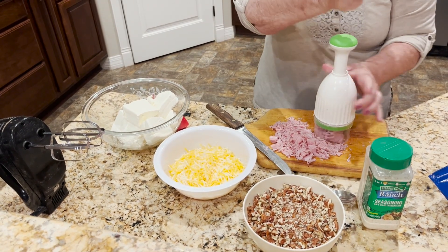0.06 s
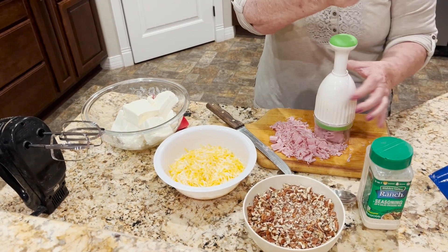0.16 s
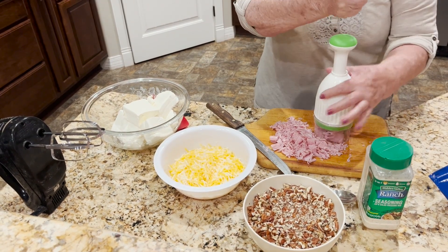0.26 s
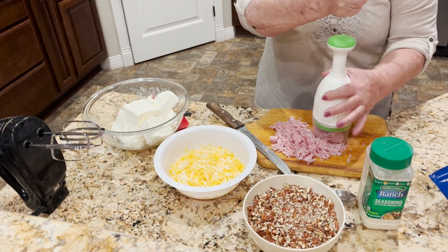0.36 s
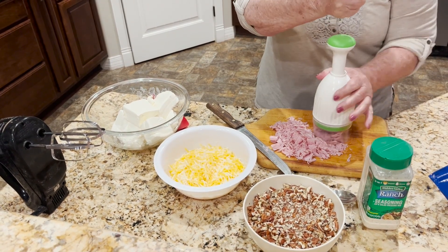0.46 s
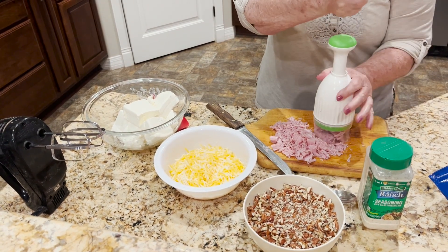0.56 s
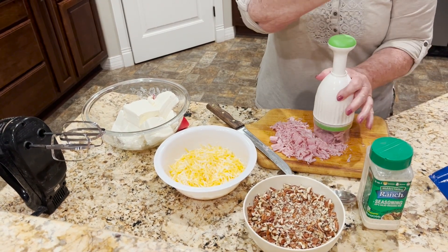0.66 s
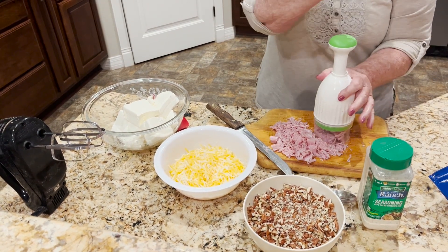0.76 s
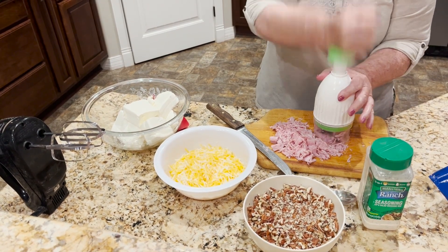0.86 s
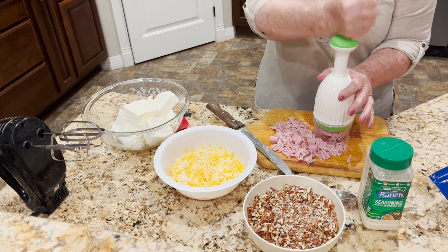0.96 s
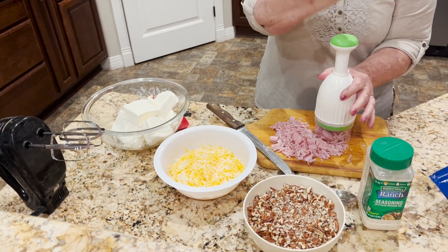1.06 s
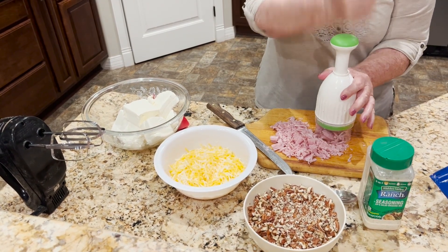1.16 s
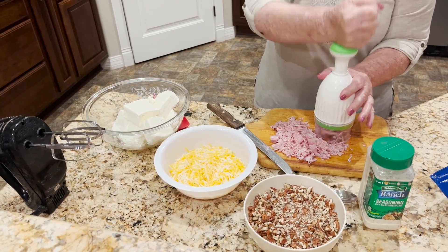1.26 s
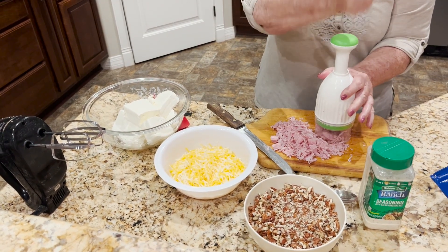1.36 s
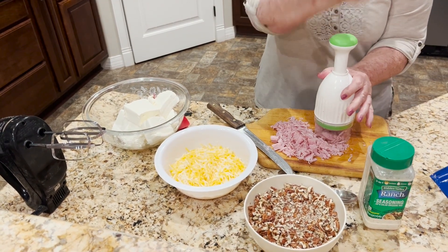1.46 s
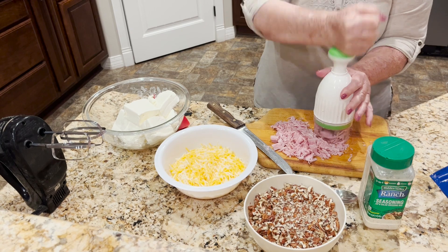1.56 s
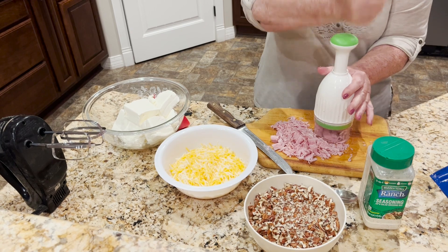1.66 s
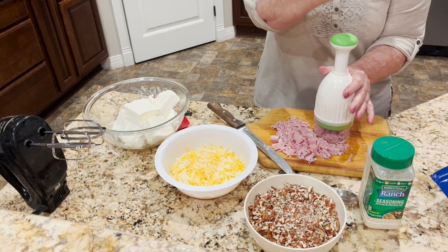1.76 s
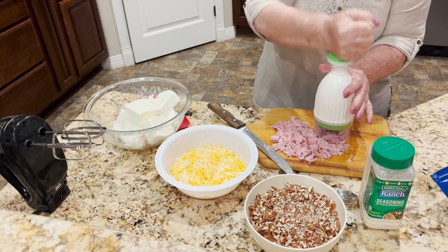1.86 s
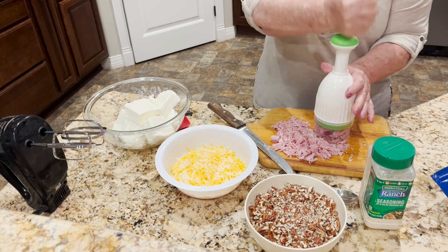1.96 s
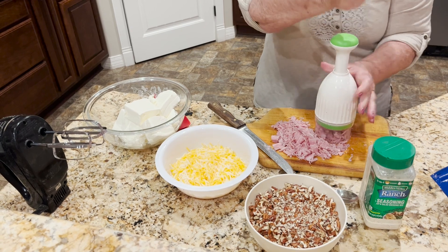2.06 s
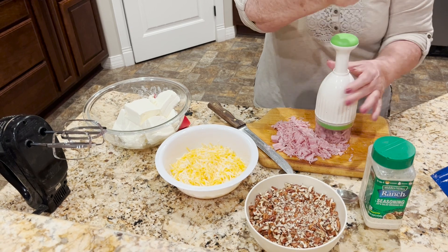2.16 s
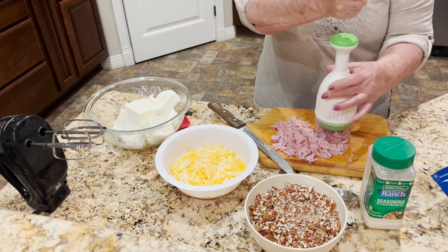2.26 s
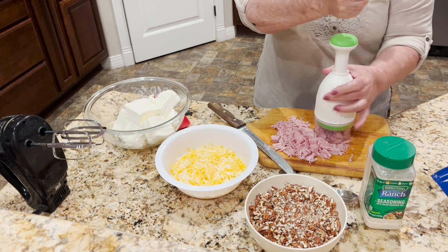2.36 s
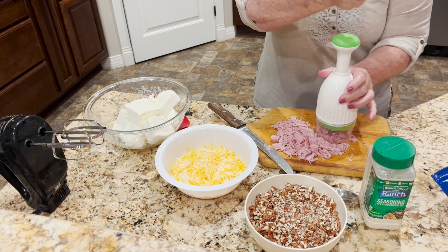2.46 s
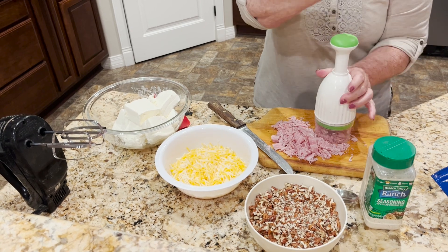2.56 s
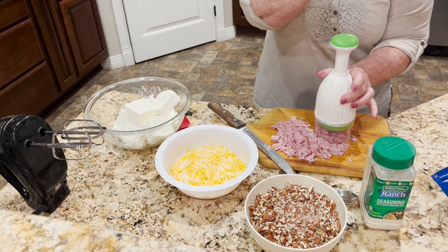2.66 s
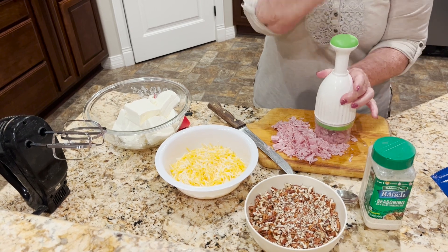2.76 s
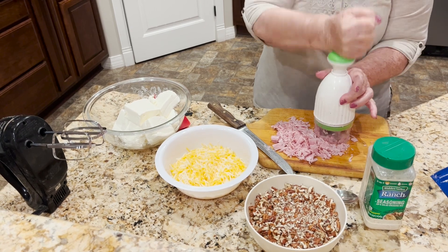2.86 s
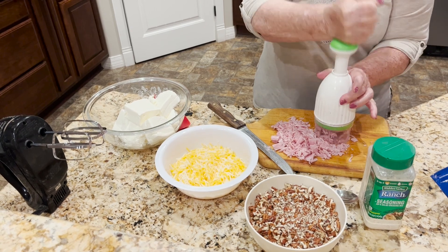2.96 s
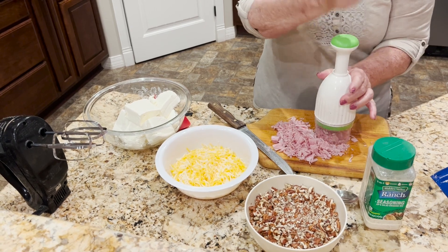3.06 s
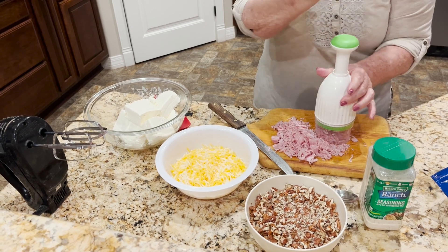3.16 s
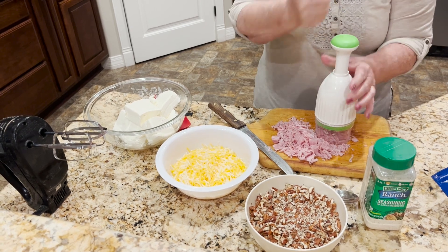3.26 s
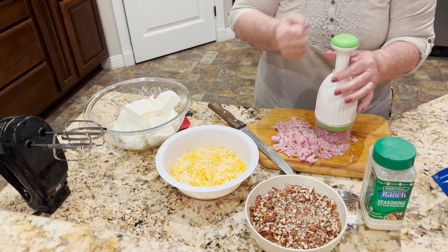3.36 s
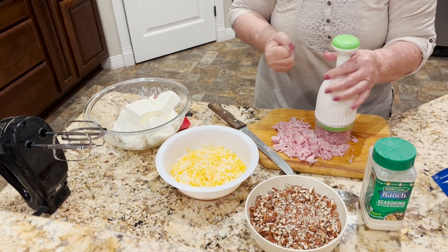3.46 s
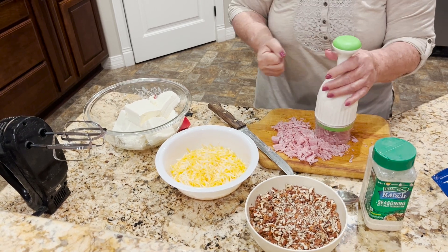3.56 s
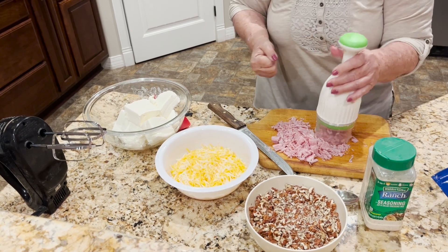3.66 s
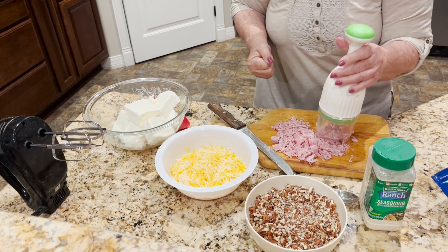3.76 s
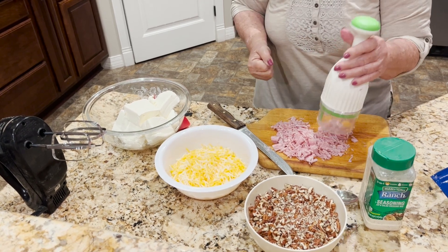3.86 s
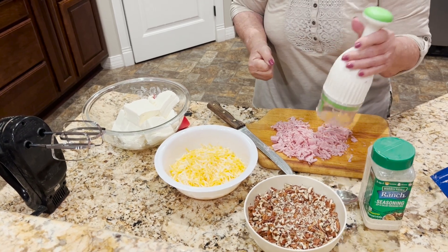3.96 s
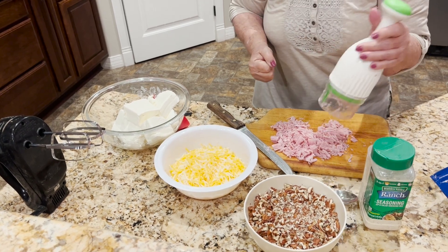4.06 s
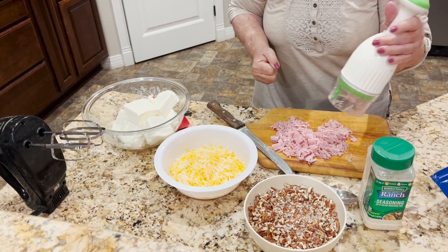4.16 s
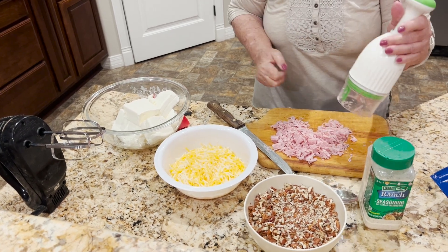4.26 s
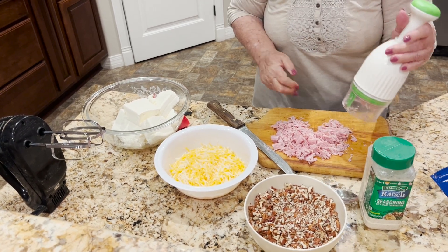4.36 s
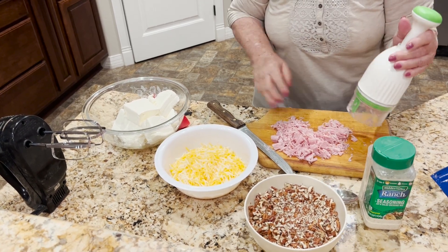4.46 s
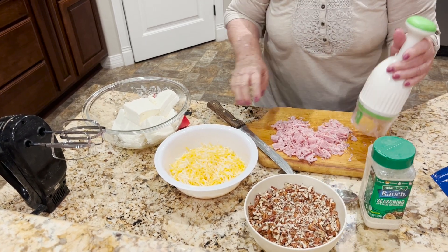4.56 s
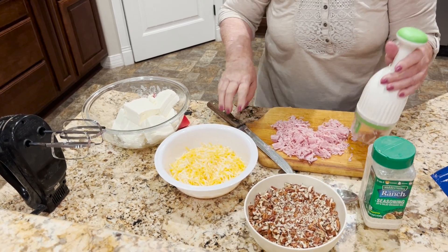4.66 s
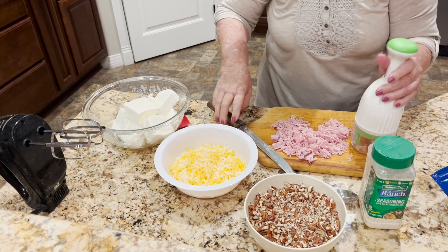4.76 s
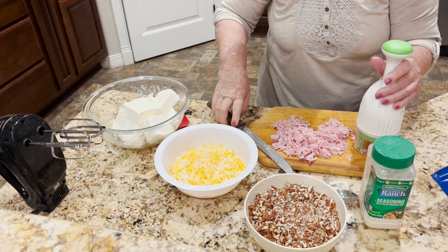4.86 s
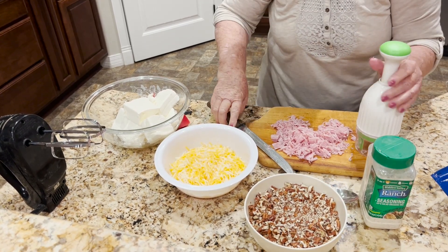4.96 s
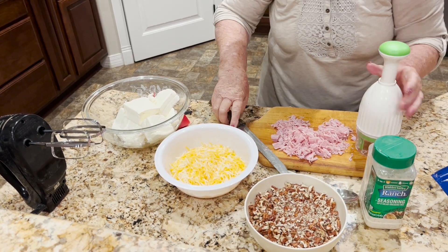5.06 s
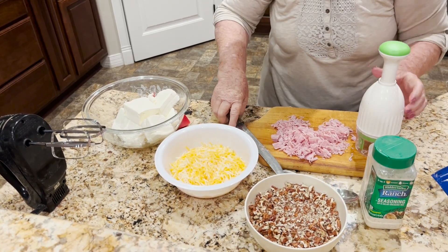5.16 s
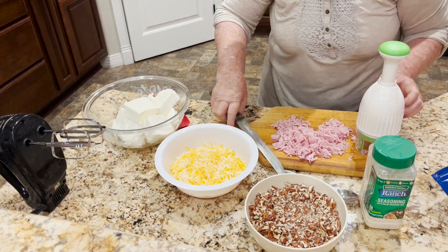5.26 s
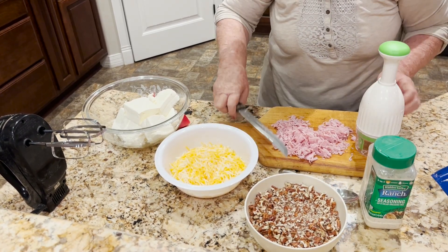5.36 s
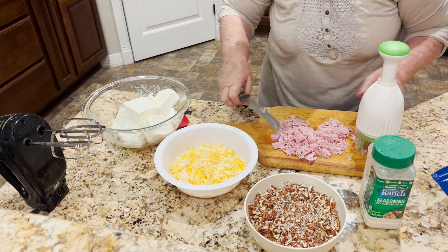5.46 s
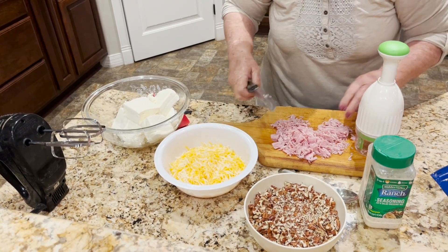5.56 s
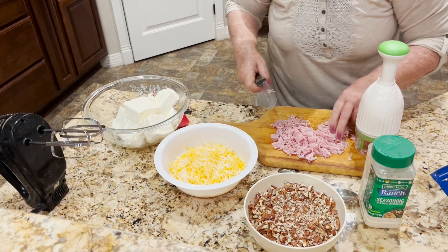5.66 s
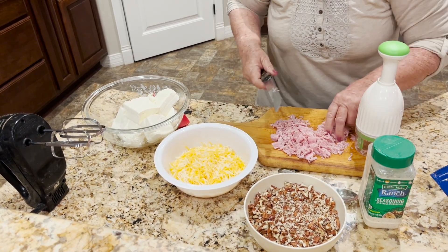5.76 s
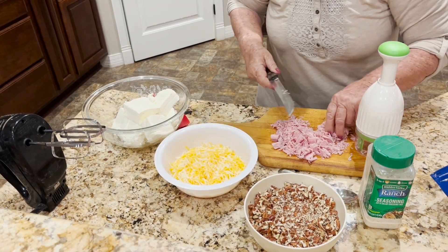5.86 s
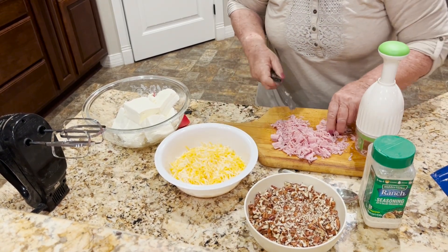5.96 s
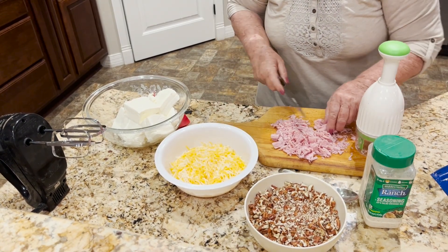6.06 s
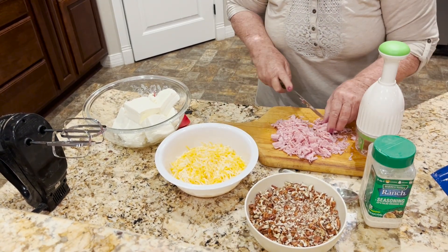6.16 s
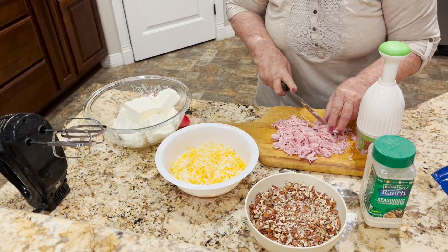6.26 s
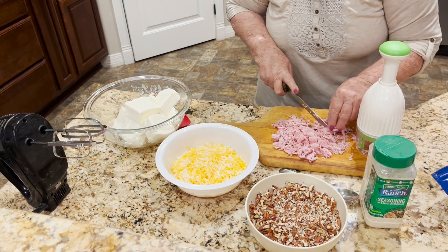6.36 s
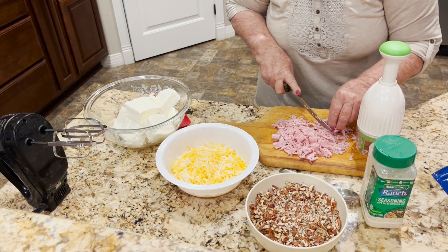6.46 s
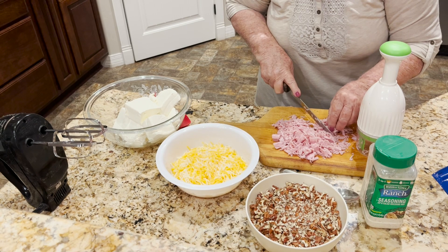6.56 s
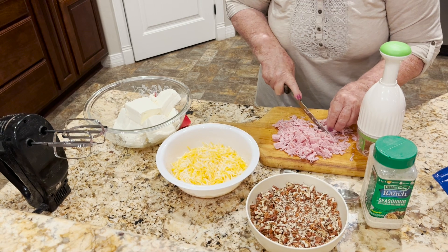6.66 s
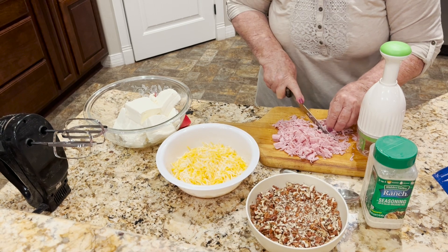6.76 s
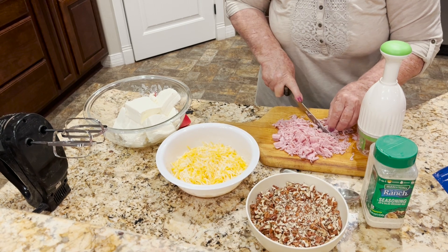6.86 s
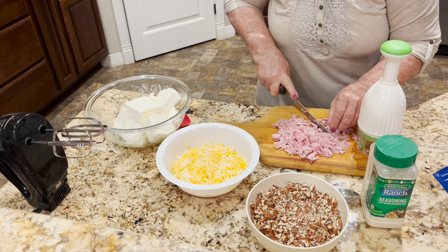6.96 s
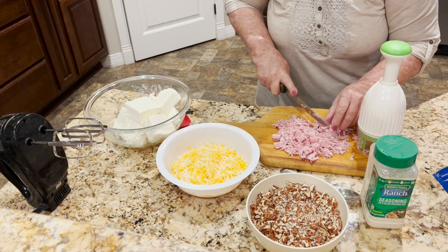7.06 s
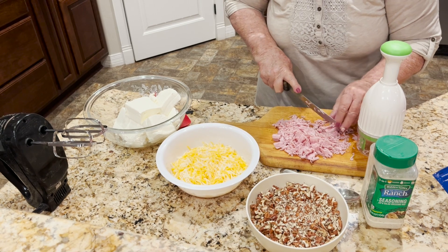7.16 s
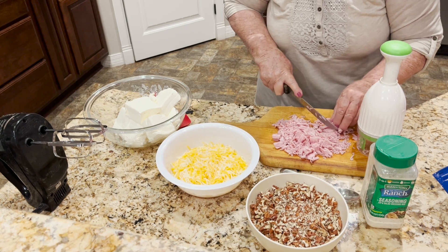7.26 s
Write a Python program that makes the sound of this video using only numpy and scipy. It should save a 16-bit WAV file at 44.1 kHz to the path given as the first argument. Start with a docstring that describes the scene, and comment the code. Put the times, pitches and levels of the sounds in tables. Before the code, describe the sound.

In a reverberant home kitchen, a spring plunger chopper is punched onto ham on a wooden board: four quick loud slams, a pause, then one more, each with a deep counter boom and a return clack. Afterwards come soft knocks, a firmer rattling set-down, faint finger ticks and a dull knife tap with barely audible wet crackles. Close stereo pickup, low appliance hum.

```python
"""Chopping ham in a kitchen

A plunger chopper is punched down on ham on a wooden board over a stone counter; each stroke is a fist
snap, cam click, blade slam and counter boom, then the spring throws the plunger back with a clack.
The chopper is lifted and set down, and a knife taps the board and is drawn through crackling wet ham.
Blows are shaped noise and damped modes, rubs are clumped noise; an appliance hums throughout.
"""
import sys
import numpy as np
from scipy import signal
from scipy.fft import rfft, irfft, next_fast_len
from scipy.io import wavfile
from scipy.ndimage import uniform_filter1d, minimum_filter1d

SR = 44100
rng = np.random.default_rng(int(sys.argv[2]) if len(sys.argv) > 2 else 0)


def materialize(psi):
    """Save the field psi as 16-bit PCM at rate SR to the path in sys.argv[1].

    A 1-D psi becomes a single channel; in a 2-D psi each row is a channel.
    """
    bounded = np.clip(np.atleast_2d(psi).T, -1, 1)
    quanta = np.round(bounded * 32767).astype(np.int16)
    wavfile.write(sys.argv[1], SR, quanta)


N = 322812
PRE = SR // 2  # samples of lead-in, for blows whose ring carries into the first moment
T = np.arange(SR) / SR  # one second of time, s

# Event levels are relative: each layer of a sound adds its own offset.
# Down strokes, timed where the blades land: land_s, force_db, fist_squareness_db, cam_lead_s, cam_db,
# blade_low_db, blade_middle_db, blade_high_db
DOWN_STROKES = [(-.125, -3.5, 0, 0.0064, -16, -2, -4, -3), (0.8581, -1.5, -3.5, 0.01, -16.5, -2.5, -9, 0),
                (1.1817, -3, -3, 0.013, -14, -15, 2.5, 0), (1.506, -1, 0.2, .0088, -19, -4.5, 7, -12),
                (1.8243, 0.5, -4, .009, -20, 3, -12.5, -4), (2.8231, 0, -1, .0058, -16.5, 3, 0.5, -3)]
# Plunger hitting its top stop: stop_s, clack_db, housing_thud_db, housing_pitch_ratio (set by the grip),
# first_touch_lead_s, blade_low_db, blade_middle_db, blade_high_db
PLUNGER_RETURNS = [(-.031, -15.5, -8, 1.04, 0.0049, -2.5, -3.5, -5),
                   (0.946, -9.5, -3.5, 0.87, 0.0037, -1.5, -0.5, -0.5),
                   (1.282, -6.5, -14, 0.97, .004, 2.5, -2.5, -4.5),
                   (1.607, -12, -4, 1.02, 0.003, -6.5, -11, 7),
                   (1.9391, -10.5, -2.5, 1.05, 0.006, 4, 1.5, -5),
                   (2.9676, -11, -2, 0.94, 0.0049, -6.5, -1.5, -2)]
# Hand sliding on the housing: start_s, length_s, level_db
HAND_SLIDES = [(.2, 0.37, -55), (2.29, 0.2, -43.5), (3.3, 0.42, -69.5)]
# Cup knocking on the board: start_s, clack_db, wood_db
CUP_KNOCKS = [(3.514, -54, -36.5), (3.590, -61, -32.5), (4.737, -20, -22), (4.7484, -24.5, -23),
              (4.753, -36, -21), (4.7703, -34.5, -35.5), (5.0502, -54.5, -47), (5.061, -70, -39.5)]
# Light ticks of fingers on plastic: start_s, level_db
FINGER_TICKS = [(4.967, -66), (5.186, -48), (5.200, -40.5)]
# Knife bumping the counter as it is picked up, then tapping the board: start_s, level_db
KNIFE_TAPS = [(5.0504, -43.5), (5.0704, -51), (6.6647, -25.5)]
# Wet ham gathered by the fingers and parting under the knife: start_s, length_s, level_db
HAM_SQUELCHES = [(5.62, 0.38, -63), (5.94, 0.14, -73.5), (6.38, 0.25, -74.5), (6.55, 0.26, -63.5),
                 (6.79, 0.22, -71.5)]
# Single wet crackles of the ham: start_s, level_db
HAM_CRACKLES = [(6.451, -65.5), (6.466, -62), (6.632, -58), (6.709, -56), (6.805, -68.5), (6.893, -64.5),
                (6.947, -62.5), (6.9953, -68)]
# Knife edge drawn along the board: start_s, length_s, level_db
KNIFE_DRAWS = [(6.79, .21, -57.5)]

# Ringing modes of each struck part: pitch_hz, level_db, t60_s
COUNTER_MODES = [(69, 0, .37), (67.5, -14, .95), (94, -9, .45), (110, -10.5, .45), (135, -12, .35),
                 (190, -18, .2)]
BLADE_MODES = [(1470, -3, .012), (3520, 0.5, .011), (4520, 0.5, .0095), (330, -8, .012), (620, -5, .012),
               (1950, 0, .013), (2380, -5, .009), (2900, -5, .009)]
KNOB_MODES = [(641, 1, 0.042), (820, 14.5, 0.0031), (1284, 3, 0.031), (1440, -6, 0.0067)]
HOUSING_MODES = [(205, -12.5, 0.01), (269, 0.5, 0.012), (294, -21.5, 0.15), (330, -0.5, 0.022),
                 (560, -11.5, 0.041), (940, -22, 0.056)]
BOARD_MODES = [(344.7, 9, 0.26), (424, 0, 0.14), (477, 3, .18), (574, -13, 0.11), (650, -11, 0.15),
               (717, -6, 0.16), (1140, -18, .15), (1540, -14, 0.13), (2354, -16.5, 0.11),
               (2821, -17.5, 0.061)]
SPRING_MODES = [(1857, -2.5, .16), (1935, -3.5, .09), (2377, -7.5, .07), (2950, -8.5, 0.057),
                (3560, -10, 0.042)]
KNIFE_MODES = [(1240, -11, 0.29), (1310, -21, 0.12), (1370, -12, 0.17), (1825, -4, 0.12), (3120, -8, 0.041),
               (3480, -17, 0.03)]

# Tone colours of contacts and rubs, read as spectrum shapes: freq_hz, relative_level_db
SNAP_COLOUR = [(40, -34), (150, -5), (700, 11), (1500, -1.5), (2700, -8.5), (4300, -1), (6000, -8),
               (8000, -3), (11000, -6), (14000, -7.5), (16500, -21.5)]
CAM_COLOUR = [(40, -35), (150, -8.5), (700, -3.5), (1500, -2.5), (2700, -4.5), (4600, 4), (6000, -6),
              (8000, -5.5), (11000, -1.5), (14000, -1.5), (16500, -24)]
SLAM_COLOUR = [(30, -24.5), (100, -6.5), (500, 2), (950, -6.5), (1400, 5.5), (1900, 3), (2350, 3.5),
               (3100, 5), (3700, -4), (4600, -3), (5500, -9.5), (6500, -10.5), (8000, -18), (12000, -26.5),
               (16500, -41.5)]
CLACK_COLOUR = [(30, -23.5), (100, 3.5), (400, 1.5), (900, -4.5), (1500, -5), (2100, -7), (3200, -2.5),
                (4600, -8.5), (6000, -15.5), (8000, -17), (12000, -23), (16500, -29)]
SKIN_COLOUR = [(150, 7.5), (700, 8), (1500, -4), (4000, -11), (8000, -17), (13000, -13.5), (16500, -22)]
CUP_COLOUR = [(30, -30.5), (100, -4.5), (370, 9.5), (900, -5), (1480, 1.5), (2000, -5.5), (2800, -1.5),
              (4300, -8), (5200, -14.5), (6600, -7.5), (8500, -19), (12000, -20.5), (16500, -30)]
WOOD_COLOUR = [(30, -42), (100, -10), (240, -12), (345, 9.5), (480, 5), (750, 6.5), (1000, -10),
               (1500, -11), (3000, -46), (16000, -49.5)]
TICK_COLOUR = [(300, 0), (900, 5), (2000, -4.5), (3000, -6), (5000, 0), (7000, 7.5), (9000, -5),
               (13000, -9.5), (16500, -18)]
TAP_COLOUR = [(150, -17), (500, -6), (900, 1.5), (1350, 6), (1700, -2), (2200, -10.5), (3100, -14),
              (3800, -25.5), (4600, -22.5), (6000, -47), (16000, -50.5)]
WET_COLOUR = [(500, -9), (3000, -9), (6500, -7), (9000, -11), (11500, -3), (14000, -2), (16500, -17)]
EDGE_COLOUR = [(500, -14), (900, -1), (1400, 4.5), (1900, -7), (2750, -12), (3070, -2), (3400, -11),
               (4050, -15), (4450, 2), (4900, -14), (5700, -28), (6330, -16), (7500, -33), (16000, -32)]

# Spectrum shape of the kitchen air: freq_hz, relative_level_db
AIR_COLOUR = [(20, -38), (45, -12), (100, -4), (145, -8), (210, -8), (320, -14), (420, -16), (520, -26),
              (1000, -33), (2000, -44), (4000, -52), (8000, -59), (12500, -59), (16000, -68)]
# Steady lines of the appliance: pitch_hz, rms_level_db
HUM_LINES = [(93, -56.5), (121, -58.5), (211, -58), (250, -73)]
# Room decay: freq_hz, t60_s
ROOM_DECAY = [(60, 0.69), (400, 0.76), (1100, 0.84), (2900, 0.65), (5000, 0.64), (7300, 0.6), (9000, 0.1),
              (14000, 0.67)]
# Colour of the room's answer: freq_hz, level_db
ROOM_COLOUR = [(60, 7.5), (200, -4), (400, 0), (800, -0.5), (1100, 4), (1450, 4), (2000, 0.5), (3200, -1),
               (5000, -4), (7500, -7), (11500, -9), (14000, -20), (16000, -20.5)]
# Left-right likeness of diffuse sound: freq_hz, correlation
STEREO_LIKENESS = [(100, .96), (300, .72), (600, .35), (1200, 0), (2200, .5), (5000, .35), (7000, .4),
                   (9000, .85), (15000, .85)]
# Phase between the microphones: freq_hz, left_lead_radians
MIC_LEAD = [(100, -.04), (800, -.2), (1600, -.35), (2500, .3), (4300, .65), (5300, 0), (6200, -1.6),
            (8500, -3.14), (11800, -6.2), (15000, -9)]
# Level between the microphones: freq_hz, left_minus_right_db
MIC_TILT = [(100, -1.2), (300, -0.8), (700, -2.5), (1500, -1), (2500, 3), (4500, 2.5), (7000, 6.5),
            (9000, -4), (15000, 3)]

TRAVEL_S, HURRY = .0222, .25  # fist to board at 0 dB force; speed grows as force to this power
SNAP_DB, SCRAPE_DB, CLICK_DB = -20.5, -12, -24  # fist snap, shaft scrape, knob's first click on its shaft
KNOB_DB, KNOB_GROWS = -12, 3  # knob ring, and how many dB it gains per dB of fist squareness
SLAM_DB, BLADES_DB, SPRING_DB = -9, -2, -32  # offsets from the force of a stroke
TOUCH_DB, RETURN_SPRING_DB, RETURN_BOARD_DB = -10, -22.5, -29.5  # first two follow the clack, board the thud
STROKE_BOOM_DB, RETURN_BOOM_DB, KNOCK_BOOM_DB = -8, -20.5, -13.5  # what each blow passes to the counter
BOOM_RISE_S, BOOM_LAG_S, LOW_HZ = .008, .005, 47  # boom swell, late start, high-pass corner
BOOM_SHARP, SETTLE_S = .25, .022  # boom starts sharp by this share and settles with this time constant
AIR_DB = -47
GAP_S = .0118  # wait before the ceiling and walls answer
BOOM_ROOM_DB = -12  # the boom arrives mostly direct
TOP_HZ = 16200  # nothing is kept from here up


def amp(db):
    """Decibels to gain."""
    return 10 ** (np.asarray(db) / 20)


def unit(x):
    """Scale to rms 1."""
    return x / np.sqrt(np.mean(x ** 2) + 1e-20)


def along(points, hz):
    """Read (Hz, value) points on a log frequency axis."""
    f, v = np.transpose(points)
    return np.interp(np.log(hz + 1), np.log(f + 1), v)


def filtered(x, response):
    """Multiply the spectrum of x by a response given as a function of frequency."""
    n = x.shape[-1]
    m = next_fast_len(n + SR // 8)
    return irfft(rfft(x, m) * response(np.fft.rfftfreq(m, 1 / SR)), m)[..., :n]


def silence():
    """An empty track with lead-in."""
    return np.zeros(PRE + N)


def add(track, s, sound):
    """Mix a sound into the track at time s."""
    part = track[PRE + round(s * SR):][:len(sound)]
    part += sound[:len(part)]


def diffuse(size, spectrum):
    """Coloured stereo noise, as alike in both channels as sound from all around."""
    def mid_side_response(hz):
        turn = np.arccos(np.clip(along(STEREO_LIKENESS, hz), -1, 1)) / 2
        return amp(along(spectrum, hz)) * np.array([np.cos(turn), np.sin(turn)])

    mid, side = filtered(rng.standard_normal((2, size)), mid_side_response)
    return np.array([mid + side, mid - side])


def contact(spectrum, t60, grit, rise=0.0023, size=4096):
    """One sharp push and a dying chatter in the colour of the struck part; energy of rms 1 for 5 ms."""
    t = T[:size]
    chatter = rng.standard_normal(size) * amp(-60 * t / t60) * (1 - np.exp(-t / rise))
    force = grit * chatter / np.linalg.norm(chatter)
    force[0] += 1
    force = rfft(force)
    # divide out the chatter's broad shape, so that the part sets the colour
    broad = np.sqrt(uniform_filter1d(np.abs(force) ** 2, size=15) + 1e-9)
    colour = amp(along(spectrum, np.fft.rfftfreq(size, 1 / SR)))
    # folding the cepstrum gives a minimum-phase filter: no sound before the blow
    cepstrum = irfft(np.log(colour / broad))
    cepstrum[1:size // 2] *= 2
    cepstrum[size // 2 + 1:] = 0
    blow = irfft(force * np.exp(rfft(cepstrum)))
    return blow / np.linalg.norm(blow) * np.sqrt(SR / 200)


def ring(modes, attack, ratio=1, scatter_db=1, detune=0.0095, phase_spread=0, sharp=0):
    """Damped modes, a little different at each blow; they may start sharp by a share and settle."""
    hz, db, t60 = np.transpose(modes)[:, :, None]
    scatter, pitch, phase = rng.standard_normal((3, len(modes), 1))
    clock = T + sharp * SETTLE_S * (1 - np.exp(-T / SETTLE_S))
    decay = amp(db + scatter_db * scatter - 60 * T / t60)
    angle = 2 * np.pi * hz * ratio * (1 + detune * pitch) * clock + phase_spread * phase
    return (decay * np.sin(angle)).sum(0) * (1 - np.exp(-(T / attack) ** 2))


def friction(rows, spectrum, clump_db, grain_rate):
    """Soft swells of tiny slips, clumped in time at grain_rate points per second."""
    out = silence()
    for s, length, db in rows:
        t = T[:int(length * SR)]
        clumps = np.interp(t * grain_rate, np.arange(SR), rng.standard_normal(SR))
        slips = rng.standard_normal(len(t)) * amp(clump_db * clumps)
        rub = unit(filtered(slips, lambda hz: amp(along(spectrum, hz))))
        add(out, s, amp(db) * signal.windows.tukey(len(t), .9) * rub)
    return out


def background():
    """Low rush of air and the slightly unsteady hum of an appliance, its phase wandering."""
    t = np.arange(N) / SR
    hum = np.zeros(N)
    for hz, db in HUM_LINES:
        drift = np.interp(t * 3, np.arange(64), rng.standard_normal(64))
        hum += amp(db) * np.sqrt(2) * np.sin(2 * np.pi * hz * t + 0.74 * drift)
    return amp(AIR_DB) * unit(diffuse(N, AIR_COLOUR)) + hum


def blades(notch_db):
    """The blades stand a notch further round each time, which shifts the weight of three modes."""
    modes = np.array(BLADE_MODES)
    modes[:len(notch_db), 1] += notch_db
    return ring(modes, attack=0.0006, scatter_db=1.5, detune=.018, phase_spread=np.pi)


def down_strokes():
    """Fist, cam and blade slam; the harder the stroke, the sooner the blades follow the fist."""
    out = silence()
    for s, force_db, fist_db, cam_lead, cam_db, *notch_db in DOWN_STROKES:
        punch = s - TRAVEL_S * amp(-HURRY * force_db)
        add(out, punch, amp(SNAP_DB + fist_db) * contact(SNAP_COLOUR, t60=0.015, grit=19.0))
        add(out, punch, amp(CLICK_DB) * contact(CAM_COLOUR, t60=.003, grit=1.0))
        # the soft fist loads the knob a moment later, and the shaft scrapes down its guide
        add(out, punch + 0.0035, amp(KNOB_DB + KNOB_GROWS * fist_db) * ring(KNOB_MODES, attack=0.0019))
        add(out, punch + .004, amp(SCRAPE_DB + fist_db) * contact(SNAP_COLOUR, t60=0.017, grit=2.9))
        # the cam turns the blades a notch on the way down
        add(out, s - cam_lead, amp(cam_db) * contact(CAM_COLOUR, t60=0.007, grit=2.8))
        add(out, s, amp(SLAM_DB + force_db) * contact(SLAM_COLOUR, t60=0.0038, grit=14))
        add(out, s, amp(BLADES_DB + force_db) * blades(notch_db))
        spring = ring(SPRING_MODES, attack=0.0011, scatter_db=3, detune=0.018)
        add(out, s, amp(SPRING_DB + force_db) * spring)
    return out


def plunger_returns():
    """The plunger touches, the housing thuds, then the plunger clacks home and jolts the other parts."""
    out = silence()
    for s, clack_db, thud_db, grip, seat, *notch_db in PLUNGER_RETURNS:
        touch = s - seat
        add(out, touch, amp(clack_db + TOUCH_DB) * contact(CLACK_COLOUR, t60=0.027, grit=7.7))
        add(out, touch + 0.0011, amp(thud_db) * ring(HOUSING_MODES, attack=0.0017, ratio=grip))
        add(out, s, amp(clack_db - 1.5) * contact(CLACK_COLOUR, t60=0.011, grit=5.3))
        # the jolt sets the blades, the spring and the board ringing
        add(out, s, amp(clack_db - 4.0) * blades(notch_db))
        add(out, s, amp(clack_db + RETURN_SPRING_DB) * ring(SPRING_MODES, attack=0.00073, detune=.012))
        add(out, s, amp(thud_db + RETURN_BOARD_DB) * ring(BOARD_MODES, attack=0.001))
    return out


def counter_boom():
    """The heavy counter takes up each blow slowly and booms; it radiates little below its lowest mode."""
    out = silence()
    blows = [(s, force_db + STROKE_BOOM_DB) for s, force_db, *_ in DOWN_STROKES]
    blows += [(s, thud_db + RETURN_BOOM_DB) for s, _, thud_db, *_ in PLUNGER_RETURNS]
    blows += [(s, wood_db + KNOCK_BOOM_DB) for s, _, wood_db in CUP_KNOCKS]
    for s, db in blows:
        boom = ring(COUNTER_MODES, attack=BOOM_RISE_S, sharp=BOOM_SHARP)
        add(out, s + BOOM_LAG_S, amp(db) * boom)
    return signal.sosfilt(signal.butter(4, LOW_HZ, "highpass", fs=SR, output="sos"), out)


def room_answer(early_db=6, early_s=0.0022, near_db=-9):
    """Near things answer faintly at once; after a gap come dense first echoes, then a decaying tail."""
    hz, t, z = signal.stft(diffuse(SR, ROOM_COLOUR), SR, nperseg=256)
    t60 = along(ROOM_DECAY, hz)[:, None]
    # each band decays at its own rate, scaled to equal energy
    fade = amp(-60 * t / t60) * np.sqrt(2 * np.log(1000) / (t60 * SR))
    tail = signal.istft(z * fade, SR, nperseg=256)[1][:, :SR]
    echoes_db = early_db * np.exp(-np.abs(T - GAP_S) / early_s)
    return tail * amp(np.where(T < GAP_S, near_db, echoes_db))


def kitchen(x, size=SR // 3):
    """The room answers overlapping pieces, each with a fresh diffuse tail, so no fixed lines stand out."""
    out = np.zeros((2, len(x) + 2 * SR))
    window = signal.windows.cosine(2 * size)
    for start in range(0, len(x), size):
        piece = x[start:start + 2 * size]
        wet = signal.fftconvolve((piece * window[:len(piece)])[None], room_answer(), axes=1)
        out[:, start:start + wet.shape[1]] += wet
    return out[:, :len(x)]


def ceiling(x, low_hz=1100, high_hz=3600):
    """One distinct slap from above, strongest in the upper middle."""
    band = signal.butter(1, [low_hz, high_hz], "bandpass", fs=SR, output="sos")
    return np.pad(signal.sosfilt(band, x), (round(GAP_S * SR), 0))[:len(x)]


def hand_slides():
    """Skin slips over the housing in soft, clumped grains."""
    return friction(HAND_SLIDES, SKIN_COLOUR, clump_db=2.5, grain_rate=130)


def cup_knocks():
    """The cup is rocked free and rattles down: plastic clack, dull wood and the ringing board."""
    out = silence()
    for s, clack_db, wood_db in CUP_KNOCKS:
        add(out, s, amp(clack_db) * contact(CUP_COLOUR, t60=0.016, grit=4.0))
        add(out, s, amp(wood_db - 2.0) * contact(WOOD_COLOUR, t60=0.03, grit=2.0))
        add(out, s, amp(wood_db - 17.0) * ring(BOARD_MODES, attack=0.0018))
    return out


def finger_ticks():
    """Fingers let go of the plastic with light, short contacts."""
    out = silence()
    for s, db in FINGER_TICKS:
        add(out, s, amp(db) * contact(TICK_COLOUR, t60=0.013, grit=1.0))
    return out


def knife_taps():
    """A chattering tap sets the knife ringing."""
    out = silence()
    for s, db in KNIFE_TAPS:
        add(out, s, amp(db) * contact(TAP_COLOUR, t60=0.0125, grit=6.9))
        add(out, s, amp(db - 11.5) * ring(KNIFE_MODES, attack=0.002))
    return out


def ham_squelches():
    """Wet ham slips and parts in clumped, bright grains."""
    return friction(HAM_SQUELCHES, WET_COLOUR, clump_db=2.5, grain_rate=100)


def ham_crackles():
    """Wet ham crackles in single tiny contacts."""
    out = silence()
    for s, db in HAM_CRACKLES:
        add(out, s, amp(db) * contact(WET_COLOUR, t60=0.0073, grit=1.6))
    return out


def knife_draws():
    """The edge slides along the board in fine, even slips."""
    return friction(KNIFE_DRAWS, EDGE_COLOUR, clump_db=0.5, grain_rate=310)


def scene():
    """All sources with their share of the room."""
    chops = down_strokes() + plunger_returns()
    boom = counter_boom()
    small = cup_knocks() + finger_ticks() + knife_taps() + ham_crackles()
    rubs = hand_slides() + ham_squelches() + knife_draws()
    send = amp(-1.0) * chops + amp(BOOM_ROOM_DB) * boom + amp(-3.5) * small + amp(-7.0) * rubs
    slap = amp(-12) * ceiling(chops + small)
    return (chops + boom + small + rubs + slap + kitchen(send))[:, PRE:] + background()


def limiter(x, ceiling_db, size=64):
    """The gain dips smoothly around each peak that would pass the ceiling, starting just ahead of it."""
    needed = np.minimum(1, amp(ceiling_db) / (np.abs(x).max(0) + 1e-9))
    return x * uniform_filter1d(minimum_filter1d(needed, size), size)


def record(dry):
    """Two spaced microphones differ in phase and level; a limiter holds peaks, then the top is cut."""
    half = np.array([[.5], [-.5]])  # each channel takes half the difference

    def microphones(hz):
        return amp(half * along(MIC_TILT, hz)) * np.exp(1j * half * along(MIC_LEAD, hz))

    pair = filtered(dry, microphones)
    return filtered(limiter(pair, ceiling_db=-.6), lambda hz: hz < TOP_HZ)


dry = scene()
out = record(dry)
materialize(out)
```